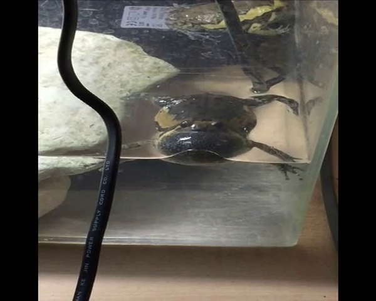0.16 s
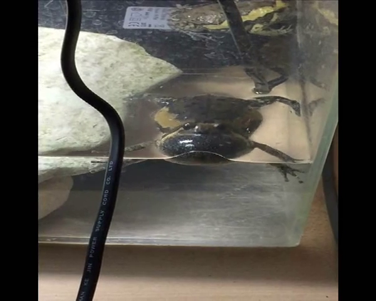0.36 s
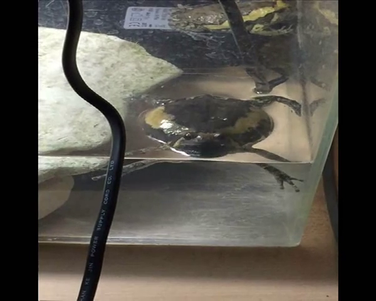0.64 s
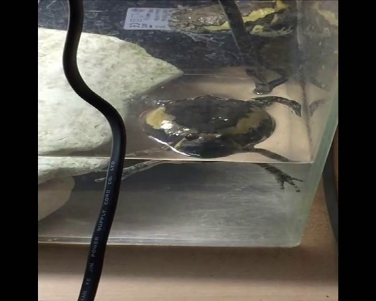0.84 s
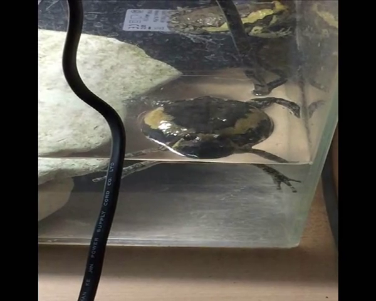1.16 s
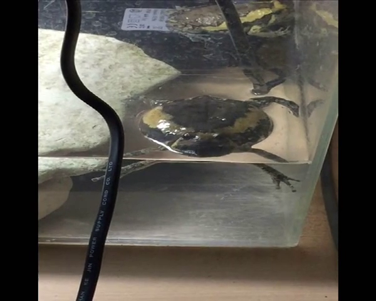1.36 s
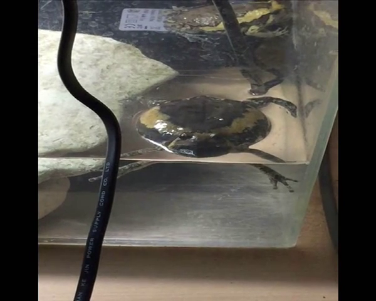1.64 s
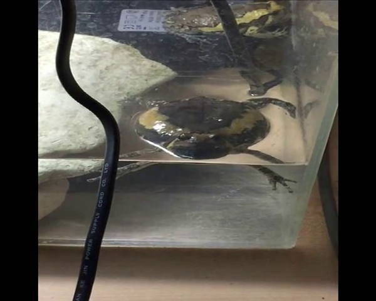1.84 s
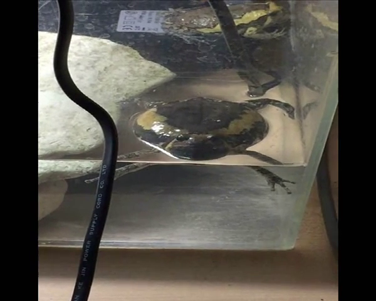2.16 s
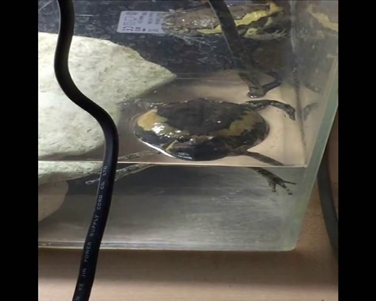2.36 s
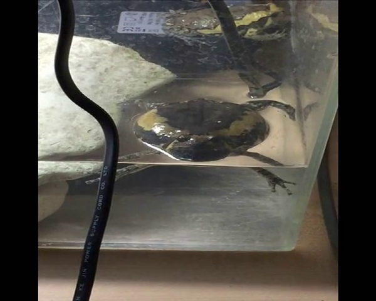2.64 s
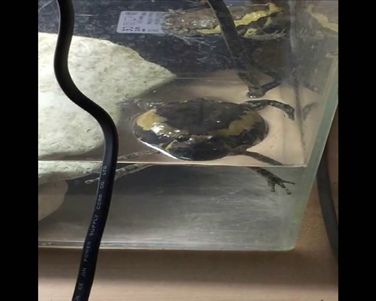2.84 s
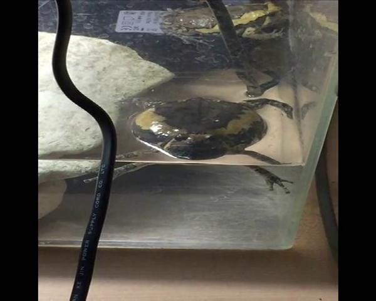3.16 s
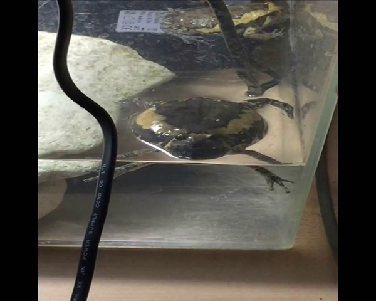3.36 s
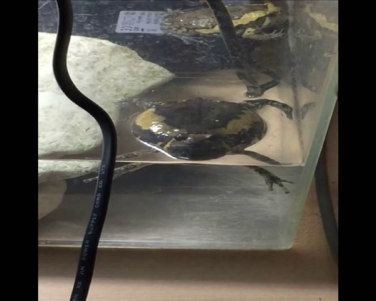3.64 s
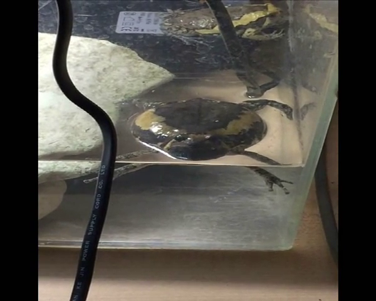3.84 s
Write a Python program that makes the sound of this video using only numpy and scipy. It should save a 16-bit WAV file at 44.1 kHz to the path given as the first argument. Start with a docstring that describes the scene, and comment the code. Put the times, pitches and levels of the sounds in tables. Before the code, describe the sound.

A frog bellows once, low and loud, then a small plop and faint high squeaks follow.

```python
"""A frog floating in a glass tank indoors gives one loud, low bellow: a rattling start of throat resonances,
a clean held note of summed harmonics that booms on the second one in the vocal sac, a sputter and a faint hum
as it lets go, then a small plop of ringing water modes. Faint high squeaks, falling sine tones, come in short
runs, and a few soft thuds ring low modes, over filtered-noise hiss and rumble and a low sine drone."""
import sys
import numpy as np
from scipy import signal
from scipy.fft import rfft, irfft
from scipy.io import wavfile

SR = 44100
rng = np.random.default_rng(int(sys.argv[2]) if len(sys.argv) > 2 else 0)


def master(y):
    """Save y as 16-bit WAV."""
    cut = np.clip(np.atleast_2d(y).T, -1, 1)
    pcm = np.round(cut * 32767)  # scale
    wavfile.write(sys.argv[1], SR, pcm.astype(np.int16))


N = 176400
TIME = np.arange(N) / SR

# colour of throat and vocal sac: (harmonic number, relative level [dB])
HARMONICS = [(1, -27), (2, -0.5), (3, -11.5), (4, -16.5), (5, -15), (6, -14.5), (7, -22), (8, -13),
             (9, -34), (10, -27), (11, -32.5), (12, -42.5), (13, -39), (14, -37), (15, -43), (16, -54.5),
             (17, -47), (18, -50.5), (19, -56), (20, -53.5), (21, -61.5), (22, -44.5), (23, -54), (24, -53),
             (25, -47), (26, -42.5), (27, -46.5), (28, -51), (29, -42), (30, -56), (31, -57), (32, -62),
             (33, -61), (34, -58.5), (35, -60), (36, -67), (37, -57.5)]
ATTACK_S = .014   # the note's onset, and both edges of the hum


def from_db(db):
    """Amplitude ratio: 20 dB is a factor of ten."""
    return 10 ** (np.asarray(db) / 20)


def rms_one(x):
    """Normalization to unit mean square."""
    return x / np.sqrt(np.mean(x ** 2) + 1e-20)


def drift(rate_hz):
    """Low-passed white noise: random fluctuation of unit power, weaker above the corner rate."""
    f = np.fft.rfftfreq(N, 1 / SR)
    spectrum = rfft(rng.standard_normal(N)) / (1 + (f / rate_hz) ** 2)
    return rms_one(irfft(spectrum, N))


def noise(spectrum):
    """Spectral shaping: white noise weighted by a curve over log frequency, at unit power."""
    hz, db = np.transpose(spectrum)
    f = np.fft.rfftfreq(N, 1 / SR) + 1e-3
    gain = from_db(np.interp(np.log(f), np.log(hz), db))
    gain = gain * np.minimum(f / hz[0], 1) ** 4   # steep fall below the first point
    return rms_one(irfft(rfft(rng.standard_normal(N)) * gain, N))


def ramp(start, length):
    """Raised-cosine transition from 0 to 1, smooth at both ends."""
    return np.sin(np.pi / 2 * np.clip((TIME - start) / length, 0, 1)) ** 2


def strike(times, levels, modes, spread_db):
    """Modal synthesis: each impulse excites damped resonators, each with a random strength."""
    out = np.zeros(N)
    for k, (hz, db, t60) in enumerate(modes):
        clicks = np.zeros(N) + 1e-18
        strengths_db = levels + db + spread_db * rng.standard_normal(len(times))
        clicks[(np.abs(times) * SR).astype(int)] = from_db(strengths_db)
        radius = from_db(-60 / (t60 * SR))   # decay per sample
        w = 2 * np.pi * hz / SR
        poles = [1, -2 * radius * np.cos(w), radius * radius]
        ring = signal.lfilter([np.sin(w), -np.sin(w)], poles, clicks) / w
        out += (-1) ** k * ring   # neighbouring modes have opposite sign
    return out


def soften(x, low_hz, high_hz):
    """Band-pass filtering: attenuation outside two edges."""
    band = signal.butter(4, [low_hz, high_hz], "band", fs=SR, output="sos")
    return signal.sosfilt(band, x)


def room(x, t60):
    """Diffuse reverberation: convolution with exponentially decaying noise of unit energy."""
    t = TIME[:SR // 2]
    tail = rng.standard_normal(len(t)) * from_db(-60 * t / t60) * (t > .004)
    return signal.fftconvolve(x, tail / np.linalg.norm(tail))[:N]


def background():
    """Stationary shaped noise, plus a tone with random phase and amplitude modulation as a wavering drone."""
    # hiss and rumble: (frequency [Hz], relative density [dB per Hz])
    room_tone = [(36, -14.5), (46, -7), (56, -5), (75, -5.5), (93, -6), (122, -12), (172, -13), (237, -9.5),
                 (300, -13.5), (475, -21), (700, -22), (1060, -23.5), (2100, -23.5), (3800, -26.5),
                 (4900, -28.5), (5900, -28), (9800, -31.5), (15000, -33.5)]
    room_tone_db = -69
    drone_hz, drone_db, drone_waver_db = 49, -73, 2.2
    drone = np.sin(2 * np.pi * drone_hz * TIME + drift(1.7))
    drone = drone * from_db(drone_db + drone_waver_db * drift(3))
    return from_db(room_tone_db) * noise(room_tone) + drone


def rattle():
    """Impulsive excitation of resonances: the larynx beats slowly and unevenly into the throat."""
    # runs of beats: (start [s], end [s], rate [beats per s], first level [dB], last level [dB])
    beat_runs = [(0.0, .048, 150, -25.5, -27.5), (.05, 0.068, 196, -26, -26),
                 (0.525, 0.594, 105, -40.5, -57)]
    # what the beats ring: (frequency [Hz], relative level [dB], t60 [s])
    throat_modes = [(243.1, -7, 0.037), (377, -1.5, .075), (481.3, -7.5, .07), (530, -3.5, 0.063),
                    (778.8, 1.5, .05), (860, -2.5, .055), (1010.5, -5.5, 0.074), (1204, -11.5, 0.035),
                    (1295, -14, .05), (1544, -20.5, 0.11), (1852, -20, 0.043), (2238, -27, .05),
                    (2600, -31, 0.03)]
    unevenness = .12   # spread of timing as a share of the beat period
    times, levels = [], []
    for start, end, rate, first_db, last_db in beat_runs:
        beats = np.arange(start, end, 1 / rate)
        slips = unevenness / rate * rng.standard_normal(len(beats))
        times.extend(beats + slips)
        levels.extend(np.interp(beats, [start, end], [first_db, last_db]))
    rings = strike(np.array(times), np.array(levels), throat_modes, spread_db=1.0)
    return soften(rings, low_hz=191, high_hz=2800)


def squeaks():
    """Frequency-modulated tones: short, falling and grainy; overtone and scratch grow with level."""
    # squeaks: (time of peak before a short lead [s], level before trim [dB], pitch at the peak before wobble [Hz])
    calls = [(.005, -52.5, 4460), (0.049, -57.5, 4490), (.09, -61.5, 4500), (0.647, -66.5, 4290),
             (.698, -60, 4360), (1.031, -71, 4300), (1.062, -65, 4450), (1.406, -59, 4520),
             (1.464, -59, 4540), (1.507, -59, 4335), (1.556, -58, 4393), (1.605, -62, 4443),
             (1.973, -64.5, 4300), (2.019, -58.5, 4310), (2.070, -66, 4350), (2.615, -63, 4340),
             (2.668, -60.5, 4350), (2.937, -72, 5950), (3.063, -64, 4340), (3.107, -57.5, 4334),
             (3.160, -59.5, 4390), (3.71, -74, 6000), (3.758, -74, 5920), (3.793, -60.5, 4366),
             (3.802, -56.5, 4230), (3.853, -53, 4095)]
    # colour of the scratch: (frequency [Hz], relative density [dB per Hz])
    scratch_spectrum = [(900, -5), (3000, -1.5), (6500, -2.5), (8400, -1.5), (10000, -6), (11400, 5),
                        (13000, -2), (15000, -6)]
    trim_db, loud_db = -2.5, -53   # at loud_db, before trim, overtone and scratch have their set levels
    rise_s, lead_s, fall_hz_per_s = .0048, .002, 2500
    wobble_hz, crackle_db, grain_db = 84.6, 4, 2.4
    overtone_db, scratch_db = -18, -11
    room_db, room_t60_s = -2.5, .24
    out = np.zeros(N)
    wobble = wobble_hz * drift(300)
    scratch = rms_one(noise(scratch_spectrum) * from_db(crackle_db * drift(900)))
    for s, db, hz in calls:
        first = max(int((s - lead_s) * SR), 0)
        span = slice(first, first + SR // 10)
        t = TIME[span] - TIME[first]
        pitch = hz + wobble[span] - fall_hz_per_s * (t - rise_s)
        phase = 2 * np.pi * np.cumsum(pitch) / SR
        shape = (t / rise_s * np.exp(1 - t / rise_s)) ** 2
        edge = from_db(overtone_db) * np.sin(2 * phase) + from_db(scratch_db) * scratch[span]
        tone = np.sin(phase) + from_db(db - loud_db) * edge
        out[span] += from_db(db + trim_db) * shape * tone
    out = out * from_db(grain_db * drift(340))
    return out + from_db(room_db) * room(out, room_t60_s)


def bellow():
    """Additive synthesis of a harmonic source in three registers, with air modulated by each cycle."""
    # held note: (time [s], pitch before sag and jitter [Hz], then levels before trim and release:
    # boom [dB], middle [dB], treble [dB])
    note_track = [(.075, 160.8, -24.5, -31, -49), (.13, 159.7, -22.5, -30, -52),
                  (.19, 161.2, -20.5, -29.5, -49.5), (.25, 162.9, -20.5, -30.5, -46.5),
                  (.3, 162.8, -20.5, -31.5, -47.5), (.35, 162, -23, -35, -49), (.42, 162.5, -25, -40, -48),
                  (.48, 161.7, -27.5, -43.5, -49), (.525, 162.1, -29.5, -46, -53)]
    # narrow high resonance that climbs as the sac tightens: (time [s], frequency [Hz])
    whistle_track = [(.06, 5200), (.2, 5450), (.36, 5700), (.46, 6130)]
    # air rushing with each cycle: (frequency [Hz], relative density [dB per Hz])
    rasp_spectrum = [(150, -12.5), (350, 8.5), (900, 0), (1500, -12), (3000, -27.5), (4500, -21),
                     (7000, -37.5), (8400, -30), (10000, -41), (13000, -24), (15000, -30)]
    note_on_s, note_off_s, note_middle_s = .055, .526, .3
    sag_hz, sag_s, jitter = 4.8, .011, .0012   # the pitch drops as the pressure goes
    middle_from_hz, treble_from_hz = 720, 1380
    boom_trim_db, middle_trim_db, treble_trim_db = -.32, -.86, .36
    boom_release_db_per_s, upper_release_db_per_s = 284.5, 650.5
    treble_delay_s = .012   # lengthens the treble's attack
    wavers_db = [1.5, 4.6, 2]   # boom, middle, treble
    knee_hz, dulling_db_per_s = 4300, 14   # above the knee the note dulls as it goes on
    whistle_from_hz, whistle_width_hz, whistle_range_db = 4300, 210, 12
    rasp_db = -52.5   # at the boom's peak, before trim and cycle modulation

    s, *columns = np.transpose(note_track)
    pitch, boom, middle, treble = [np.interp(TIME, s, c) for c in columns]
    pitch = (pitch - sag_hz * ramp(note_off_s, sag_s)) * (1 + jitter * drift(50))
    phase = 2 * np.pi * np.cumsum(pitch) / SR
    after = np.maximum(TIME - note_off_s, 0)
    onset = ramp(note_on_s, ATTACK_S)
    treble_onset = ramp(note_on_s, ATTACK_S + treble_delay_s)
    boom_gain = from_db(boom + boom_trim_db - boom_release_db_per_s * after) * onset
    middle_gain = from_db(middle + middle_trim_db - upper_release_db_per_s * after) * onset
    treble_gain = from_db(treble + treble_trim_db - upper_release_db_per_s * after) * treble_onset
    gains = [boom_gain, middle_gain, treble_gain]

    whistle = np.interp(TIME, *np.transpose(whistle_track))
    multiples, colour = np.transpose(HARMONICS)
    registers = np.digitize(multiples * np.mean(columns[0]), [middle_from_hz, treble_from_hz])
    out = np.zeros(N)
    for k, db, register in zip(multiples, colour, registers):
        share = from_db(db) / np.linalg.norm(from_db(colour[registers == register]))
        swing_db = wavers_db[register] * (1 - share) * drift(5)   # weak harmonics waver most
        if k * pitch.mean() > knee_hz:
            swing_db = swing_db - dulling_db_per_s * (TIME - note_middle_s)
        if k * pitch.mean() > whistle_from_hz:
            resonance = 1 / (1 + ((k * pitch - whistle) / whistle_width_hz) ** 2)
            swing_db = swing_db + whistle_range_db * (resonance - .5)
        harmonic = np.sin(k * phase + rng.uniform(0, 2 * np.pi))
        out += np.sqrt(2) * share * gains[register] * from_db(swing_db) * harmonic
    air = noise(rasp_spectrum) * (1 + .5 * np.cos(phase))
    return out + from_db(rasp_db - boom.max()) * boom_gain * air


def hum():
    """Harmonic series with a steep spectral slope: the sac sounds once more, weakly, as the larynx closes."""
    # faint hum: (start [s], length [s], pitch [Hz], level before fade and harmonic colour [dB])
    faint_hum = (.618, .095, 158, -53.5)
    dulling_db, fade_db_per_s = 5.5, 118.5   # dulling is per harmonic, counted from the second
    start, length, hz, db = faint_hum
    shape = ramp(start, ATTACK_S) - ramp(start + length - ATTACK_S, ATTACK_S)
    shape = shape * from_db(db - fade_db_per_s * (TIME - start))
    tone = np.zeros(N)
    for k, level in HARMONICS[:6]:
        tone += 2 * from_db(level - dulling_db * (k - 2)) * np.sin(2 * np.pi * k * hz * TIME)
    return shape * tone


def plops():
    """Damped modes with scaled pitch: water laps as the frog's body swells again, and echoes in the tank."""
    # laps of water: (time [s], strike level [dB], pitch ratio)
    laps = [(.722, -63.5, 0.67), (.728, -59, 0.34), (.74, -56.5, 1.0), (.75, -65, .62)]
    # water modes: (frequency at pitch ratio 1 [Hz], relative level [dB], t60 [s])
    water_modes = [(535, -7, .13), (759, -9, .1), (1215, 1, .12), (1280, -5, .08), (1550, -16, .05)]
    tank_db, tank_t60_s = -14.5, .11
    rings = np.zeros(N)
    for s, db, ratio in laps:
        modes = [(hz * ratio, level, t60) for hz, level, t60 in water_modes]
        rings += strike(np.array([s]), db, modes, spread_db=5)
    lap = soften(rings, low_hz=281, high_hz=1800)
    return lap + from_db(tank_db) * room(lap, tank_t60_s)


def thuds():
    """Impulse response of low damped modes, band-limited to a few soft, dull thuds."""
    # thuds: (time [s], strike level [dB])
    knocks = [(2.749, -62), (2.89, -67), (2.981, -66)]
    # what they ring: (frequency [Hz], relative level [dB], t60 [s])
    low_modes = [(55.6, 3, .3), (96, -14, 0.094)]
    rings = strike(*np.transpose(knocks), low_modes, spread_db=4)
    return soften(rings, low_hz=30.1, high_hz=180.7)


def scene():
    """Superposition: the frog, direct and reverberant, with squeaks, thuds and room tone."""
    room_t60_s, frog_room_db = .28, -19
    frog = bellow() + hum() + rattle() + plops()
    reflected = from_db(frog_room_db) * room(frog, room_t60_s)
    return (frog + reflected + squeaks() + thuds() + background())[None]


def record(dry):
    """Linear filtering by the microphone: a narrow partial dip in the treble and a steep low-pass."""
    notch_hz, notch_q, notch_depth = 10406, 26, .41   # depth is the share of amplitude removed
    peak = signal.lfilter(*signal.iirpeak(notch_hz, notch_q, fs=SR), dry)
    coloured = dry - notch_depth * peak
    low_pass = signal.ellip(10, .1, 80, 15200, fs=SR, output="sos")   # ripple dB, stop dB, cutoff Hz
    return signal.sosfilt(low_pass, coloured)


dry = scene()
out = record(dry)
master(out)
```